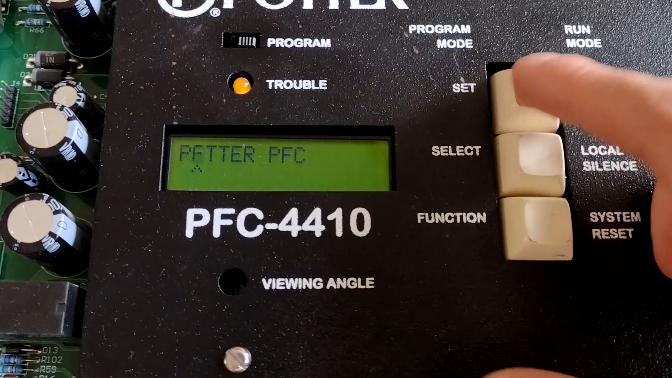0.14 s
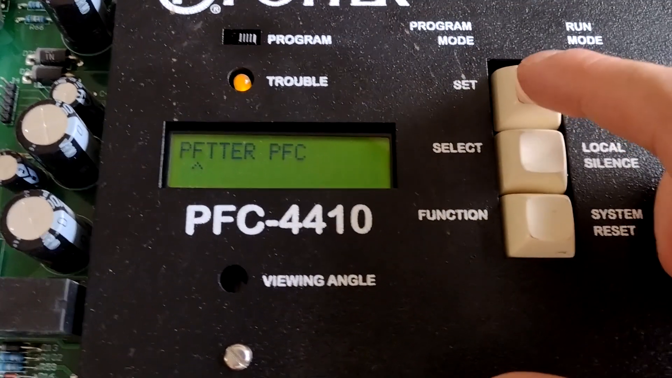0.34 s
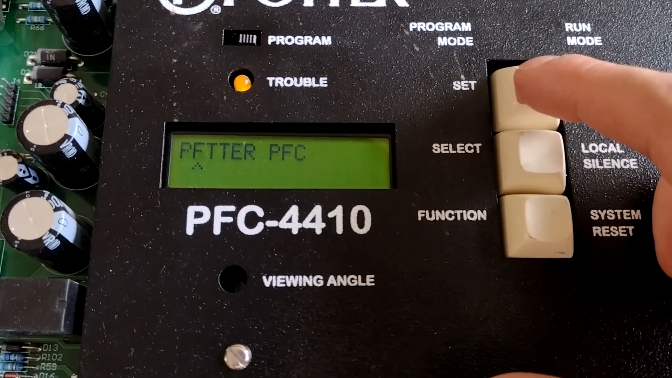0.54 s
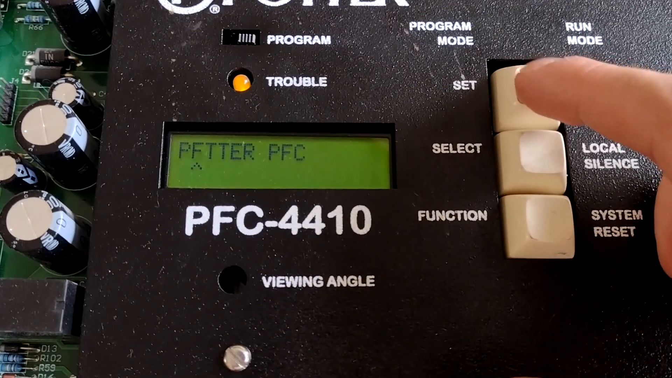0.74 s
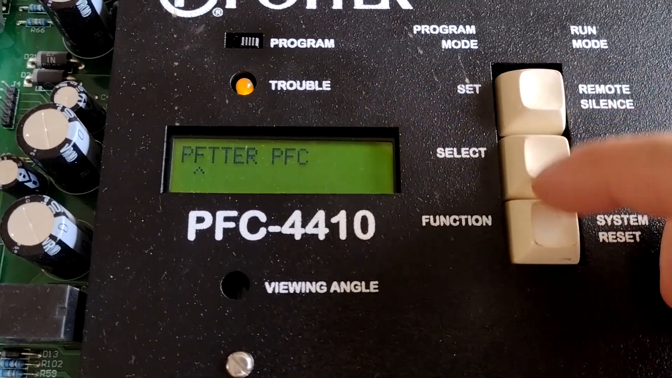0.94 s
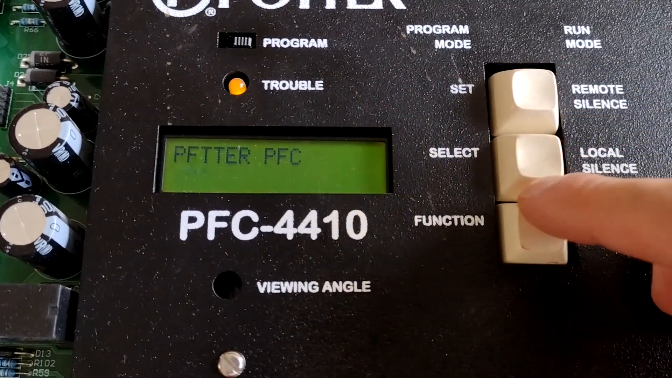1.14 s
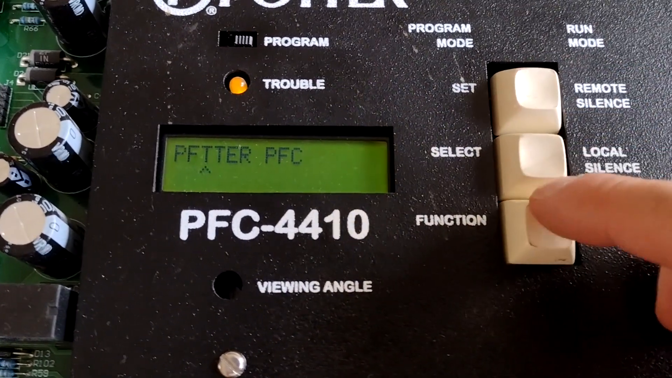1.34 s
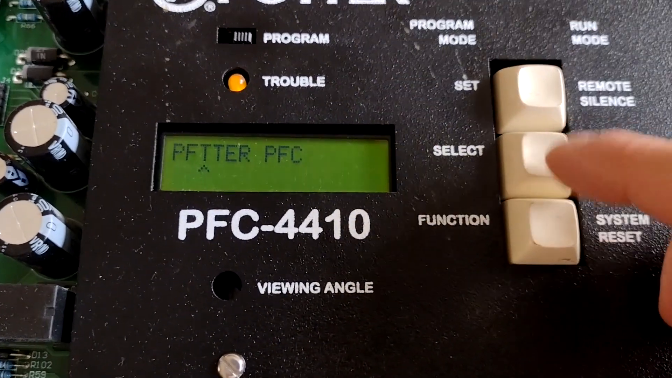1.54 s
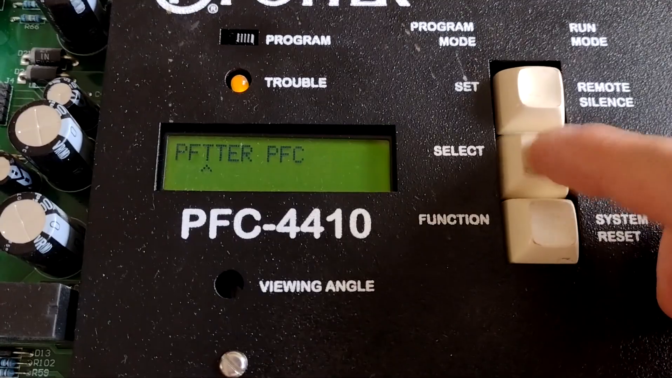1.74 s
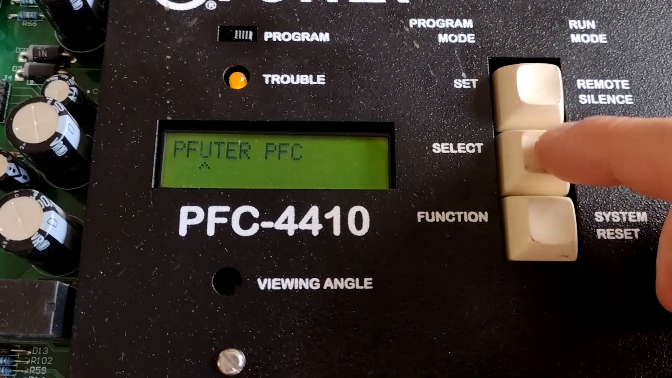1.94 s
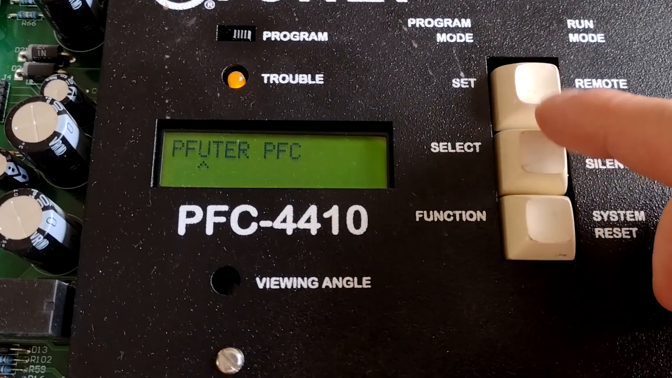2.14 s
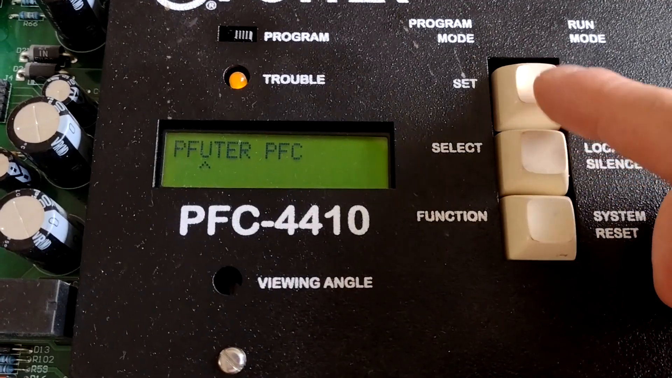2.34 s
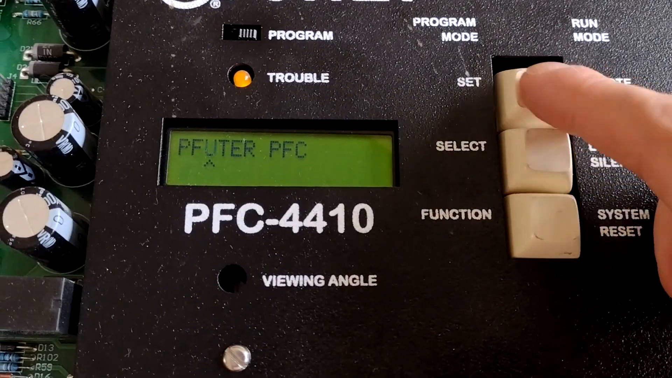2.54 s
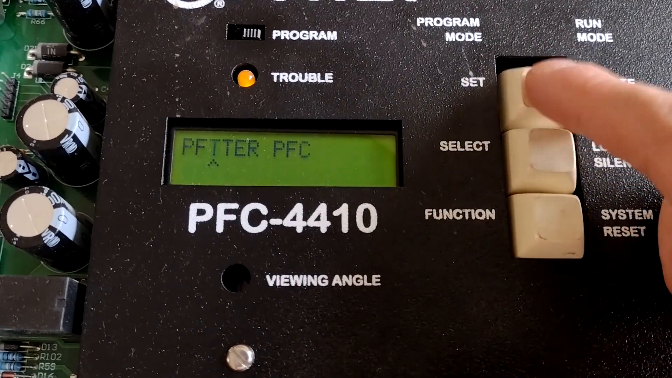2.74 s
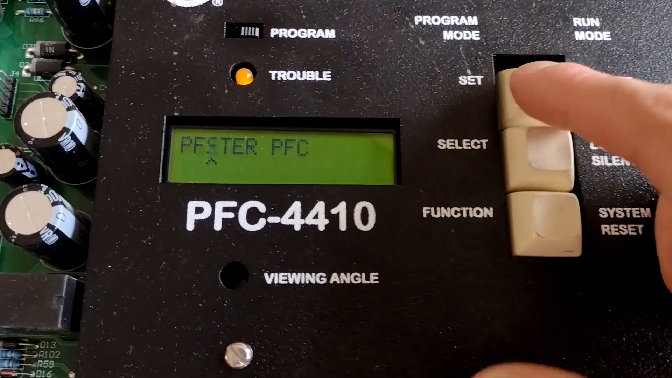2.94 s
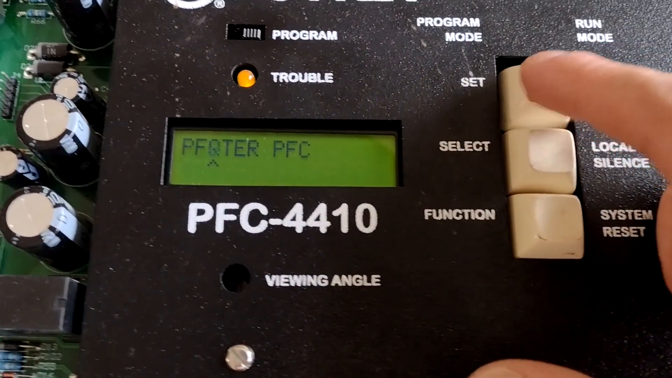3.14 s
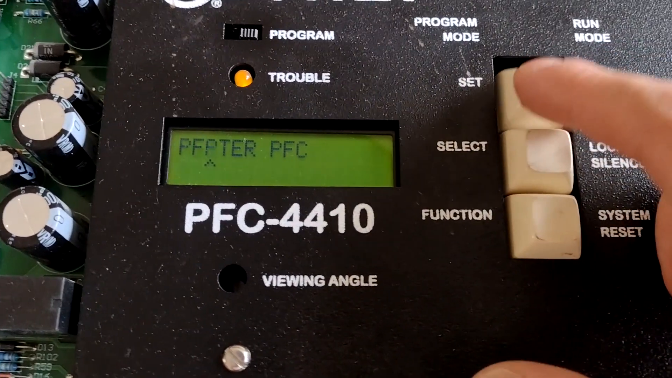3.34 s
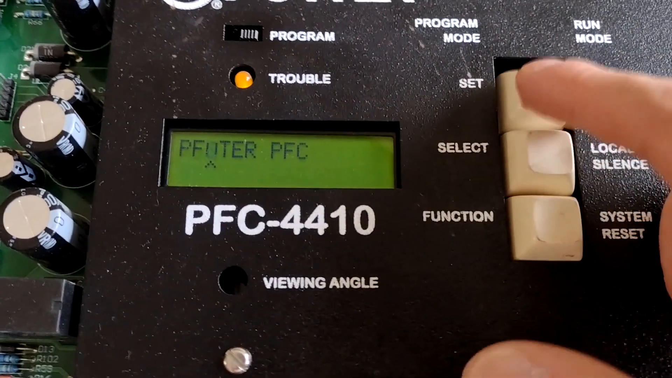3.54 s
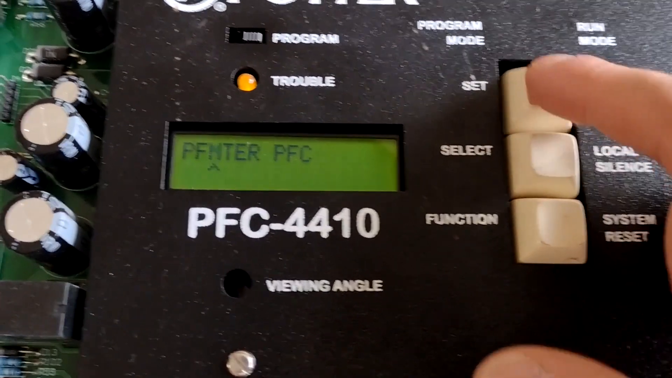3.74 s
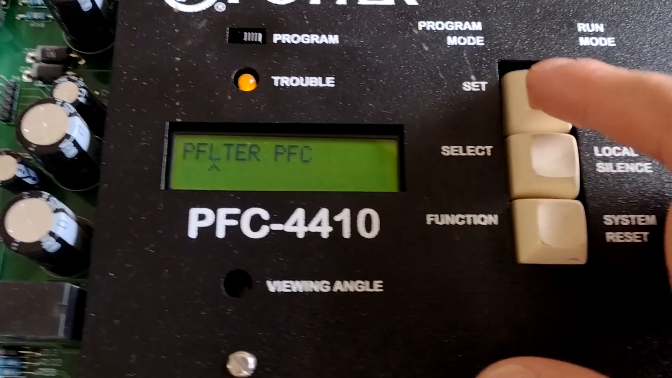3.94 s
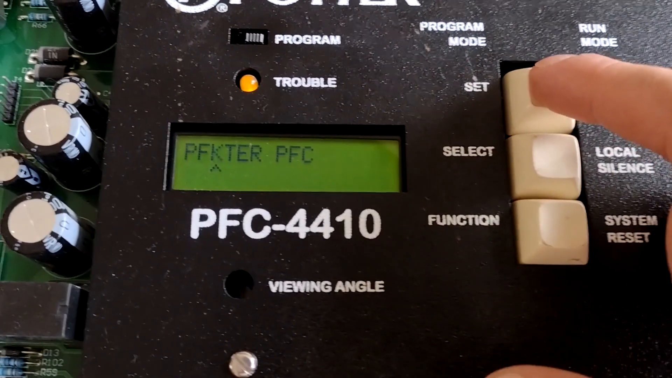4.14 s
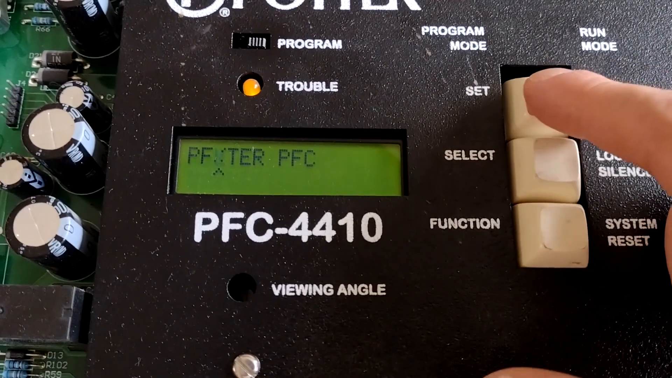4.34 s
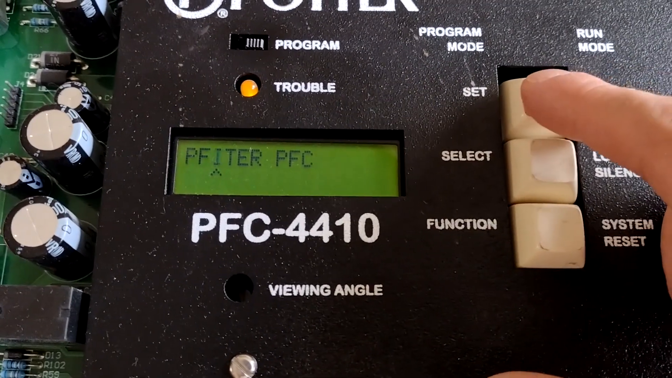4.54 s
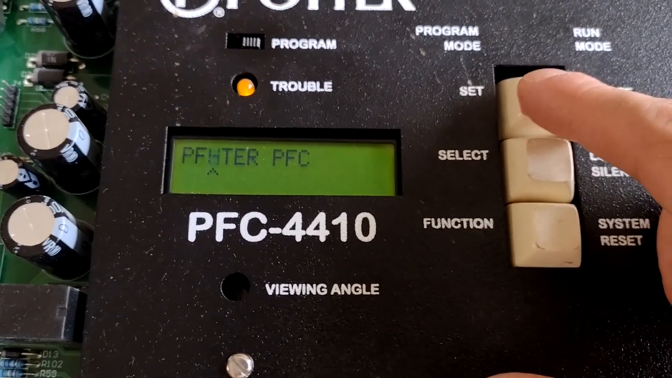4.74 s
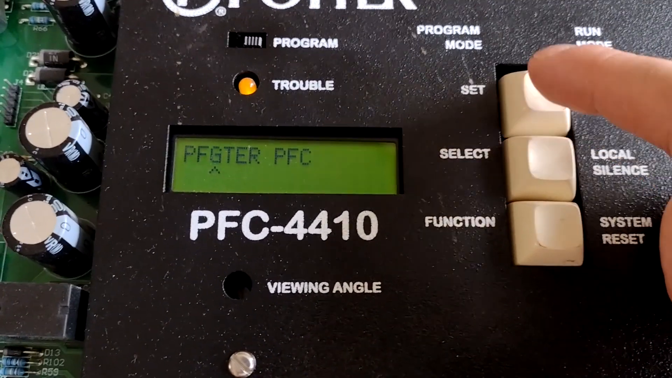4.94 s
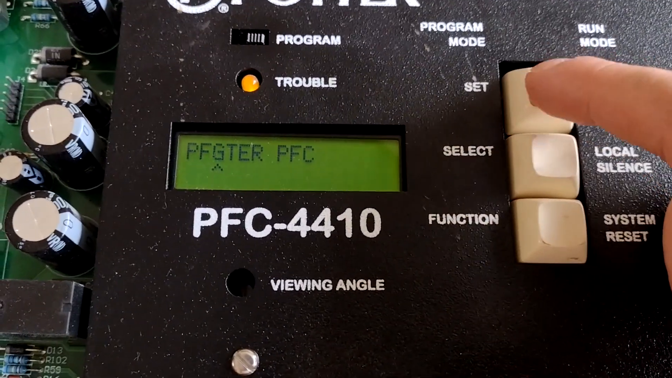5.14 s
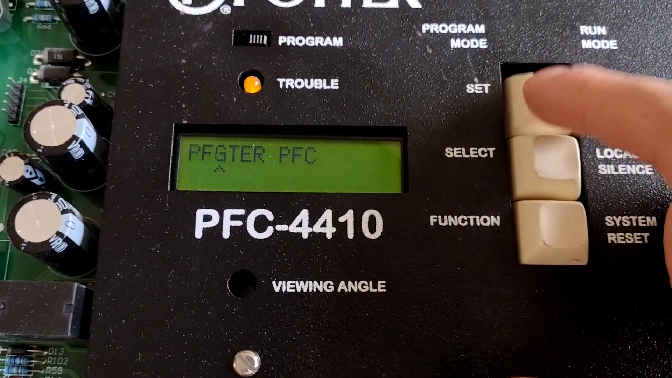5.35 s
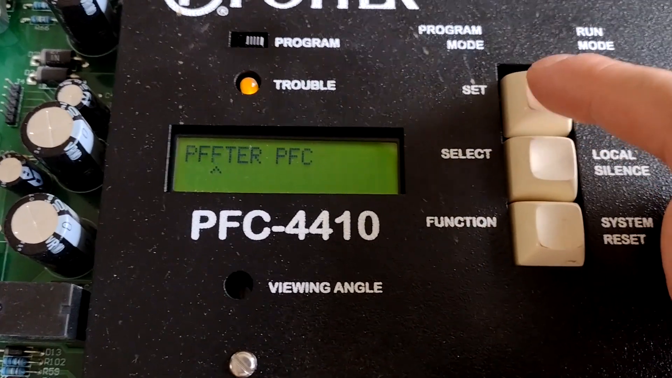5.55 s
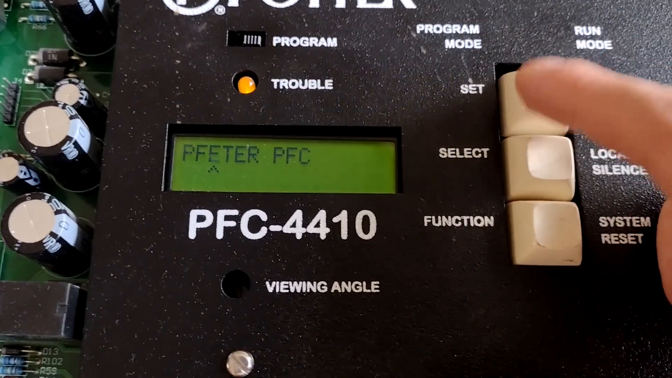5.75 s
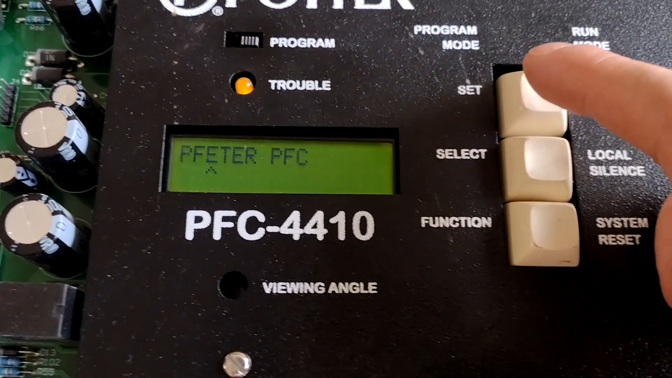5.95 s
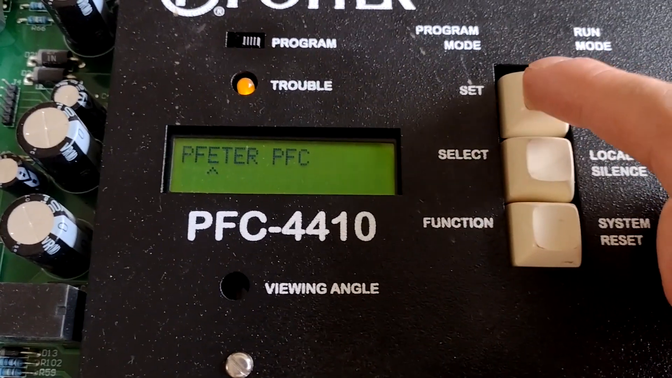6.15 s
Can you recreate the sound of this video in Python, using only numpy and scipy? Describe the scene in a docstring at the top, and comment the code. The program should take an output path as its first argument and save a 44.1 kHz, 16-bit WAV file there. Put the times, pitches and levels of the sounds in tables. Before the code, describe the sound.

Dry, hard plastic key clicks with a short, boxy metallic knock, heard close up in a small room. Soft fingertip brushes and weak taps separate the first few presses; a lower key sounds deeper. Midway the key is pumped rapidly, snapping and rattling without full release, then come spaced presses and a bright, bouncing clatter as it is freed. A soft airy rumble and low mains hum continue throughout.

```python
"""Sharp snaps of a plastic key on a sheet-metal control panel, close to a phone, over a faint electrical hum.
A finger works the keys singly and in one quick run; freed keys clatter back, and sliding plastic rasps.
Blows are filtered impulses with grit; slides are dense noise grains that swell and die away.
All these forces are convolved with one response: decaying plate modes, cabinet noise and a small room.
Soft ventilation noise and mains harmonics lie beneath."""
import sys
import numpy as np
from scipy import signal
from scipy.fft import rfft, irfft
from scipy.io import wavfile

SR = 44100
rng = np.random.default_rng(int(sys.argv[2]) if len(sys.argv) > 2 else 0)


def generate_wav(sig):
    """Save sig (samples, or channels by samples) to the path in sys.argv[1] as 16-bit PCM at SR."""
    pcm = np.round(np.clip(np.atleast_2d(sig).T, -1, 1) * 32767).astype(np.int16)
    wavfile.write(sys.argv[1], SR, pcm)


N = 273861  # length in samples

# key snaps and light fingertip taps: start_s, level_db, bass_tilt_db, treble_tilt_db (see contact)
SNAPS = [(0.1209, 1.5, 1, -3.5), (0.805, -42, 7, -23), (1.0373, -26.5, 16, 7), (1.059, -11, -2, 9),
         (1.414, -23, -3, 3.5), (1.5118, -19.5, 4.5, -2), (1.735, -35, 3.5, -14.5), (1.837, 4, -4.5, -4),
         (1.9472, 2, -5.5, 0), (2.5674, -25, -11, -2.5), (2.606, -6, -3.5, -11.5), (2.787, -15.5, 8, -3),
         (2.8381, -7.5, 4.5, -26), (2.9904, 7.5, -6.5, -7), (3.1382, 1.5, 3, -15.5), (3.2711, 3.5, 0, -14),
         (3.3685, -12, 8.5, -1.5), (3.4268, 7, -5, -3.5), (3.528, -11.5, 3.5, 0.5), (3.567, 4, -1, -12.5),
         (3.693, -10.5, 9, 5), (3.7133, -0.5, 2.5, -19.5), (3.8237, -13.5, 4.5, 3.5),
         (3.861, 4.5, -4.5, -5), (4.0237, -9, 2, 6.5), (4.188, -31.5, 13, -1), (4.3453, -8, -10, 2.5),
         (4.359, 1, -1, -7), (4.889, -27.5, 4, 5), (4.9284, -5, -5, 3), (5.4523, -5.5, 0, -10),
         (5.7503, 3.5, -11, -5)]
# keys springing back to the stop: start_s, level_db, bass_tilt_db, treble_tilt_db,
# bounce_delay_s, bounce_db (relative to the first blow)
RETURNS = [(0.2284, -2, 2.5, -4, 0.0026, 3), (2.702, 4, 7.5, 4, .0039, -19),
           (2.9016, 9.5, 6, 3, .0049, -10), (4.9389, -3, 5, 2.5, 0.0056, -1),
           (5.5655, 4, 4, 5.5, .0052, -3.5), (5.831, 12, 6.5, 6, 0.0043, -9.5)]
# fingertip brushing over the key caps: centre_s, half_length_s, level_db, treble_tilt_db, place (0 to 1)
RUBS = [(0.204, 0.053, -42, -1.5, 0.089), (1.012, 0.027, -68.5, -17, 1.0), (1.07, 0.013, -41, -4, .1),
        (1.14, 0.021, -53.5, 10, 0.24), (1.254, 0.016, -52.5, 12, 0.66), (1.527, .014, -48, -5, 0.71),
        (1.835, 0.0058, -34, -2, .9), (2.681, 0.11, -51.5, 2.5, .1), (2.808, .021, -45, 6.5, .1),
        (5.652, .018, -48, -2, 0.11)]
# rasp of sliding plastic, with the key cap's own ring: frequency_hz, gain_db
RASP = [(300, 7), (600, 2.5), (1000, 1), (1500, -4.5), (1900, -2.5), (2400, 0), (3100, 1), (3650, -2.5),
        (4100, -9.5), (4600, -13.5), (5500, -4), (6800, -5.5), (12000, -2)]
# deeper knock on the slacker part of the plate: frequency_hz, gain_db (at place 1)
LOWER_KEY_COLOUR = [(700, 0), (1000, 1), (1300, 10.5), (1650, -1.5), (2200, -7.5), (3300, -3), (4500, 0),
                    (6000, -1.5), (12000, 10.5)]
# modes of the face plate: frequency_hz, t60_s, left_db, right_db (relative levels at the two microphones)
PLATE_MODES = [(235.6, 0.033, -35, -33), (411.5, 0.15, -25, -23.5), (535.6, 0.15, -20, -20),
               (618, 0.21, -29, -27), (723, 0.21, -23.5, -25.5), (803, 0.2, -21.5, -25),
               (882.4, 0.32, -28, -23.5), (920.6, 0.082, -17, -13), (1146.6, 0.083, -7.5, -15),
               (1408, 0.07, -5, -27), (1543.5, 0.039, -11.5, 0), (1520, 0.23, -19, -24),
               (1565, 0.085, -2.5, -18.5), (1616, 0.074, -13.5, -23), (1818, 0.038, -2, -24),
               (2134, 0.014, -0.5, -1), (2159, 0.018, -7, -9), (2240, 0.02, -21, -28),
               (2440, 0.01, -27, -31.5), (2840, .06, -32, -27), (3060, 0.019, -33, -24.5),
               (3580, 0.026, -8, -17.5), (3779, 0.052, -29, -20.5), (4396, 0.053, -23, -41.5),
               (4527, 0.05, -24.5, -30), (5260, .05, -36, -24.5)]
# countless small modes of keys and cabinet: frequency_hz, relative_db
CABINET_COLOUR = [(100, -24), (300, -18), (480, -6.5), (1000, -1.5), (1500, 4), (1900, 0.5), (2300, 1.5),
                  (3000, -12), (4400, -9.5), (5800, -23), (10000, -35.5), (13000, -36), (16000, -46.5)]
# reverberation of the room: frequency_hz, relative_db
ROOM_COLOUR = [(60, -21.5), (170, -3), (240, -3.5), (300, -9.5), (400, 2.5), (900, -1), (1250, -1),
               (1570, 5.5), (1900, 0), (2400, -2), (3000, -11.5), (3800, -10.5), (7000, -30),
               (15000, -52.5)]
# ventilation noise: frequency_hz, relative_db
AIR_COLOUR = [(15, -47), (25, -22.5), (101, -5), (243, -9.5), (318, -18), (363, -12.5), (438, -24),
              (488, -15), (637, -20.5), (903, -19), (1000, -22.5), (4380, -33), (15000, -42)]
# mains harmonics: frequency_hz, rms_level_db
HUM = [(120, -77), (240, -80), (480, -84.5)]

# the finger works the lower keys between these times, otherwise the top key
LOWER_KEYS_FROM_S, LOWER_KEYS_TO_S = 1.3, 2.2
TOP_PLACE, LOWER_PLACE = 0.09, 0.84  # place on the plate: 0 stiff top to 1 slack bottom
QUICK_RUN_FROM_S, QUICK_RUN_TO_S = 2.95, 3.9  # the top key is pumped without being let go
LIFT_S = 0.064  # in the run, the finger eases off this long after each snap
FULL_STROKE_DB = -8.5  # weaker taps hardly move the key, so it does not slide
AIR_DB = -68  # rms level
TOP_HZ = 15900  # upper limit of the phone


def snaps():
    """Buckling: the key's spring snaps over and knocks the plate where that key sits."""
    force = np.zeros(N)
    for start_s, level_db, bass_db, treble_db in SNAPS:
        add(force, knock(level_db, bass_db, treble_db, key_place(start_s)), start_s)
    return force


def knock(level_db, bass_db, treble_db, place, grit_db=-5, grit_t60=0.018, grit_hz=3300):
    """Impulsive excitation: one clean blow, with a trace of grit as the plastic seats."""
    t = np.arange(SR // 20) / SR
    blow = signal.lfilter(*signal.butter(1, 7000, fs=SR), signal.unit_impulse(len(t)))
    grit = unit(rng.standard_normal(len(t)) * fade(t, grit_t60))
    grit = signal.lfilter(*signal.butter(1, grit_hz, "high", fs=SR), grit)
    blow = blow + undb(grit_db) * grit
    return undb(level_db) * contact(strike_point(seat(blow, place)), bass_db, treble_db)


def contact(force, bass_db, treble_db):
    """Contact spectrum: a heavy contact pushes more bass into the plate, a hard one more treble."""
    bass = [(110, 0.003), (230, 0.44 * bass_db), (550, 0.82 * bass_db), (1100, 0.005)]
    treble = [(2100, 0), (3700, 0.7 * treble_db), (12000, 1.39 * treble_db)]
    return colour(force, bass + treble)


def strike_point(force, ripple_db=1.38):
    """Modal excitation: no two blows land alike, so each favours slightly different modes."""
    hz = np.geomspace(300, 14000, 30)
    return colour(force, np.column_stack([hz, ripple_db * rng.standard_normal(len(hz))]))


def key_place(s):
    """Driving point: place on the plate of the key under the finger at s seconds."""
    return LOWER_PLACE if LOWER_KEYS_FROM_S < s < LOWER_KEYS_TO_S else TOP_PLACE


def seat(force, place):
    """Local stiffness: the lower a key sits on the slackening plate, the deeper it sounds."""
    return colour(force, [(hz, place * gain_db) for hz, gain_db in LOWER_KEY_COLOUR])


def returns(chatter_db=-4, chatter_t60=0.063, blow_db=-5.0, loose_s=0.0019):
    """Repeated impact: the freed key hits its stop, bounces once and chatters in its guide."""
    force = np.zeros(N)
    t = np.arange(SR // 10) / SR
    for start_s, level_db, bass_db, treble_db, bounce_s, bounce_db in RETURNS:
        chatter = grains(len(t), spread_db=5.5) * fade(t, chatter_t60)
        chatter = chatter * np.minimum(t / loose_s, 1)
        blows = undb(chatter_db) * unit(chatter)
        add(blows, undb([blow_db]), 0)
        add(blows, undb([blow_db + bounce_db]), bounce_s)
        blows = contact(strike_point(blows), bass_db, treble_db)
        add(force, undb(level_db) * blows, start_s)
    return force


def quick_strokes():
    """Selection by time and strength: start and level of each full snap in the quick run."""
    return [(s, db) for s, db, *_ in SNAPS
            if QUICK_RUN_FROM_S < s < QUICK_RUN_TO_S and db > FULL_STROKE_DB]


def rattles(level_db=-19.0, follow=0.8, bass_db=13, treble_db=0, scatter_db=1, scatter_s=0.002):
    """Loose-fit impact: in the run the key knocks as the finger eases off, louder after a harder press."""
    force = np.zeros(N)
    strokes = quick_strokes()[:-1]
    scatter = rng.standard_normal((len(strokes), 2))
    for (s, stroke_db), (strength, late) in zip(strokes, scatter):
        rattle_db = level_db + follow * stroke_db + scatter_db * strength
        rattle = knock(rattle_db, bass_db, treble_db, TOP_PLACE)
        add(force, rattle, s + LIFT_S + scatter_s * late)
    return force


def rubs():
    """Superposition of all sliding: the fingertip on the caps and the keys in their guides."""
    return slides(RUBS) + down_slides() + up_slides() + run_slides()


def slides(moves):
    """Stick-slip friction: tiny slips swell and die away; moves have the columns of RUBS."""
    force = np.zeros(N)
    t = np.arange(-SR // 10, SR // 10) / SR
    for centre_s, half_s, level_db, treble_db, place in moves:
        slips = grains(len(t), spread_db=1)
        swell = np.exp(-(t / half_s) ** 2)
        rub = seat(slips / slips.std() * swell, place)
        add(force, undb(level_db) * contact(rub, 0, treble_db), centre_s + t[0])
    return colour(force, RASP)


def down_slides(lead_s=0.009, half_s=0.012, level_db=-45.5, treble_db=10.5, follow=0.7):
    """Guide friction: on a single press the key slides down just before it snaps, louder if harder."""
    run = quick_strokes()
    presses = [(s, db) for s, db, *_ in SNAPS if db > FULL_STROKE_DB and (s, db) not in run]
    return slides([(s - lead_s, half_s, level_db + follow * db, treble_db, key_place(s))
                   for s, db in presses])


def up_slides(lead_s=0.010, half_s=0.018, level_db=-43, treble_db=4, follow=0.45):
    """Guide friction on release: the freed key slides up just before it hits the stop."""
    return slides([(s - lead_s, half_s, level_db + follow * db, treble_db, key_place(s))
                   for s, db, *_ in RETURNS])


def run_slides(lift_half_s=0.015, lift_db=-41, follow=0.8, lift_treble_db=5,
               lead_s=0.023, push_half_s=0.015, push_db=-41, push_treble_db=8):
    """Alternating friction: in the run the key scrapes up, louder after a harder snap, then down again."""
    strokes = quick_strokes()
    lifts = [(s + LIFT_S, lift_half_s, lift_db + follow * db, lift_treble_db, TOP_PLACE)
             for s, db in strokes[:-1]]
    pushes = [(s - lead_s, push_half_s, push_db, push_treble_db, TOP_PLACE) for s, _ in strokes]
    return slides(lifts + pushes)


def plate(t):
    """Modal synthesis: damped sines ring, each taking about half a cycle to build up."""
    ring = 0
    for hz, t60, left_db, right_db in PLATE_MODES:
        build_up = signal.butter(1, [hz * 2 / 3, hz * 3 / 2], "band", fs=SR)
        mode = signal.lfilter(*build_up, np.sin(2 * np.pi * hz * t) * fade(t, t60))
        ring = ring + np.outer(undb([left_db, right_db]), mode)
    return unit(ring)


def cabinet(t, t60=0.066, level_db=-5.0, build_s=0.0016):
    """High modal density: the keys and the box behind the plate ring as short, decaying noise."""
    ring = diffuse(len(t), apart_hz=1090) * fade(t, t60) * np.minimum(t / build_s, 1)
    return undb(level_db) * unit(colour(ring, CABINET_COLOUR))


def room(t, t60=0.34, level_db=-10.0, build_s=0.025, right_db=-1.65):
    """Diffuse reverberation: reflections gather over a few metres and die quickly."""
    tail = diffuse(len(t), apart_hz=1001, alike=0.83) * fade(t, t60) * np.minimum(t / build_s, 1)
    return undb(level_db) * unit(colour(tail, ROOM_COLOUR)) * undb([[0], [right_db]])


def background():
    """Stationary noise and harmonics: soft ventilation rumble and hiss, with mains hum."""
    t = np.arange(N) / SR
    air = colour(diffuse(N, apart_hz=500, alike=0.8), AIR_COLOUR)
    air = np.sqrt(N) * unit(air)  # rms of one
    hum = 0
    for hz, level_db in HUM:
        hum = hum + undb(level_db) * np.sqrt(2) * np.sin(2 * np.pi * (hz * t + rng.random()))
    return undb(AIR_DB) * air + hum


def undb(db):
    """Logarithmic level: decibels to amplitude gain."""
    return 10 ** (np.asarray(db) / 20)


def unit(x):
    """Energy normalisation: scale to a mean energy of one per channel."""
    return x / np.sqrt(np.mean(np.sum(x ** 2, axis=-1)))


def fade(t, t60):
    """Exponential damping: decay of 60 dB in t60 seconds."""
    return np.exp(-np.log(1000) * t / t60)


def grains(count, spread_db):
    """Random excitation: dense micro-impacts of uneven size."""
    size, strength = rng.standard_normal((2, count))
    return size * undb(spread_db * strength)


def diffuse(count, apart_hz, alike=0.77):
    """Spatial coherence: noise at two microphones, alike in the bass, unrelated well above apart_hz."""
    likeness = min(alike, 1) / (1 + (np.fft.rfftfreq(count, 1 / SR) / apart_hz) ** 4)
    spectra = rfft(rng.standard_normal((2, count)))
    mid, side = spectra * np.sqrt([1 + likeness, 1 - likeness])
    return irfft(np.array([mid + side, mid - side]), count)


def colour(x, points, size=4096):
    """Minimum-phase filtering: a causal filter whose gain follows (Hz, dB) points."""
    hz, db = np.transpose(points)
    freqs = np.maximum(np.fft.rfftfreq(size, 1 / SR), 1)
    gain = undb(np.interp(np.log(freqs), np.log(hz), db))
    # folding the cepstrum onto positive times makes the response causal
    cepstrum = irfft(np.log(gain))
    cepstrum[1:size // 2] *= 2
    cepstrum[size // 2 + 1:] = 0
    response = irfft(np.exp(rfft(cepstrum)))
    return np.apply_along_axis(lambda row: signal.fftconvolve(row, response)[:len(row)], -1, x)


def add(track, sound, s):
    """Superposition: mix a sound into a track at s seconds."""
    start = max(int(s * SR), 0)
    track[start:start + len(sound)] += sound[:len(track) - start]


def scene(right_db=0.03):
    """Linear response: all key forces drive the plate and cabinet, and through them the room."""
    t = np.arange(SR // 2) / SR
    left, right = plate(t) + cabinet(t) + room(t)
    # the right microphone is a little further from the keys: two samples late
    response = np.array([left, undb(right_db) * np.roll(right, 2)])
    # the response gives little deep bass below about 110 Hz
    response = signal.lfilter(*signal.butter(1, 110, "high", fs=SR), response)
    force = snaps() + returns() + rattles() + rubs()
    panel = signal.fftconvolve(force[None], response, axes=1)[:, :N]
    return panel + background()


def record(dry):
    """Band limitation: the phone cuts the top of the treble with a steep low-pass."""
    return signal.sosfilt(signal.ellip(8, 0.2, 70, TOP_HZ, fs=SR, output="sos"), dry)


dry = scene()
out = record(dry)
generate_wav(out)
```